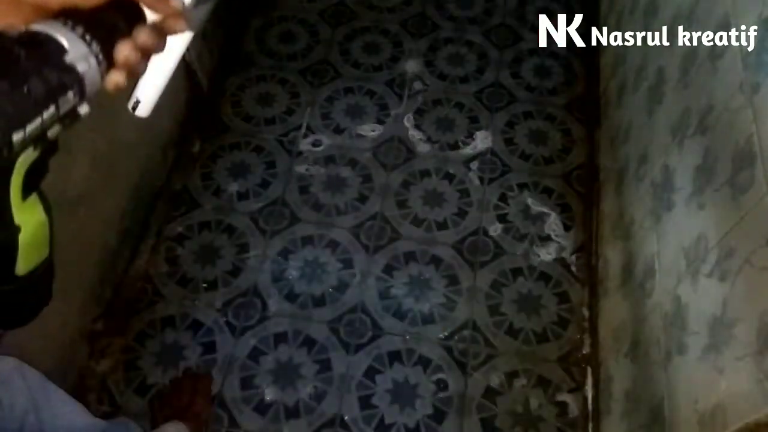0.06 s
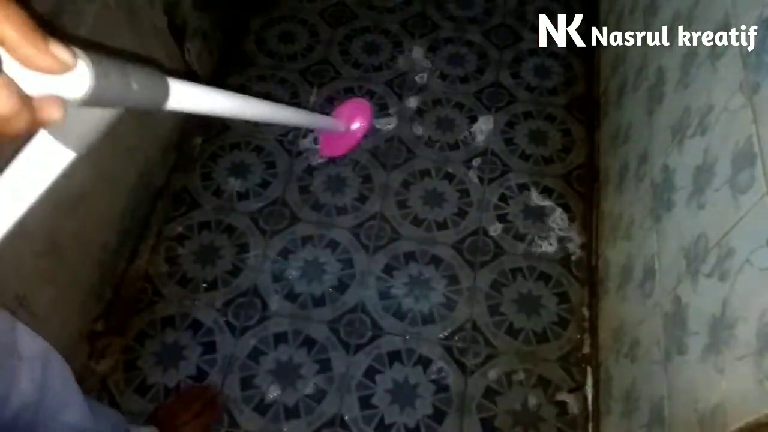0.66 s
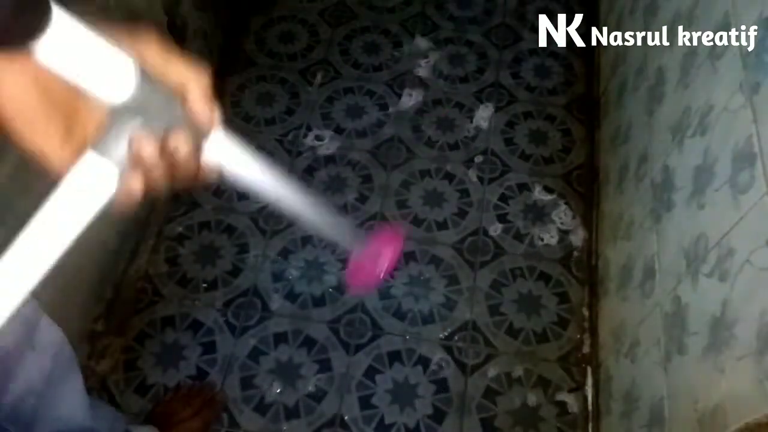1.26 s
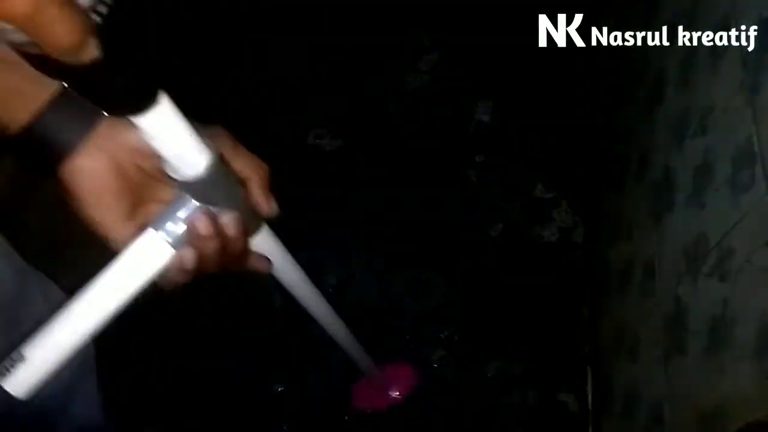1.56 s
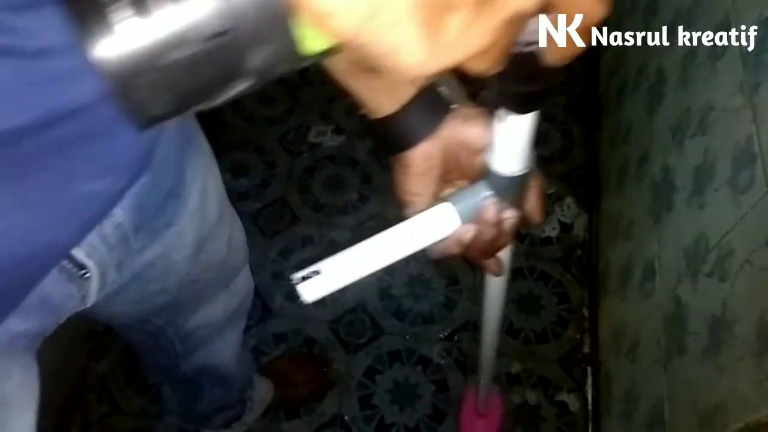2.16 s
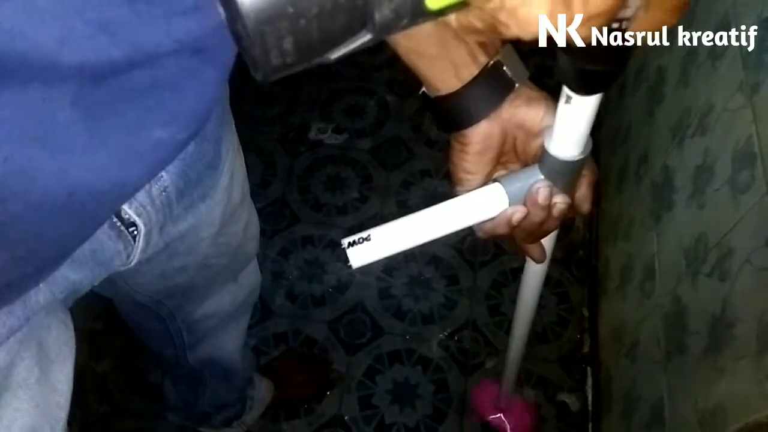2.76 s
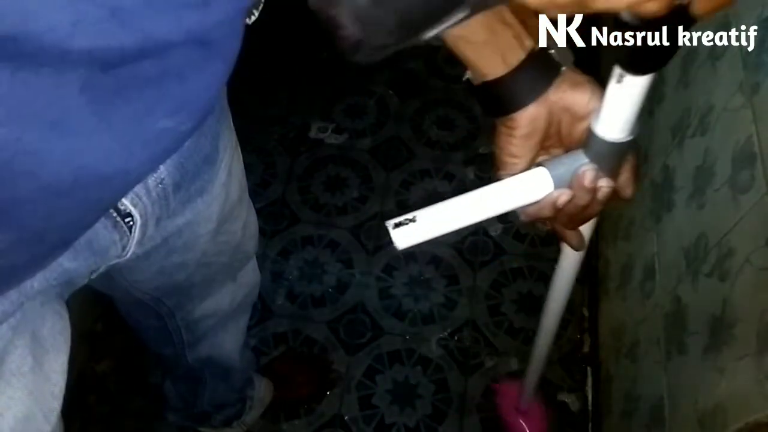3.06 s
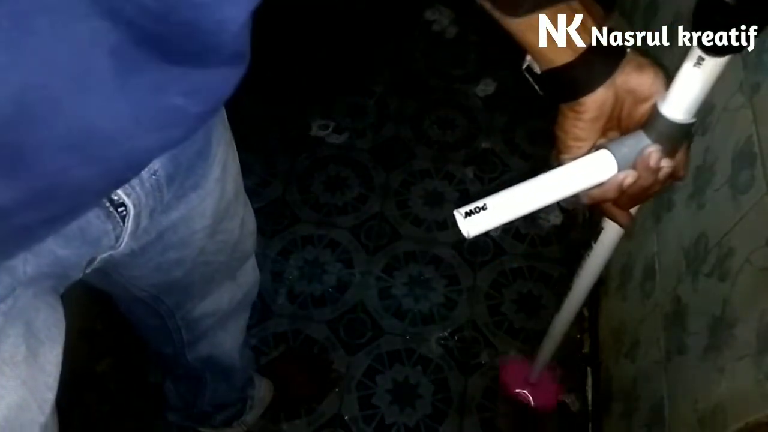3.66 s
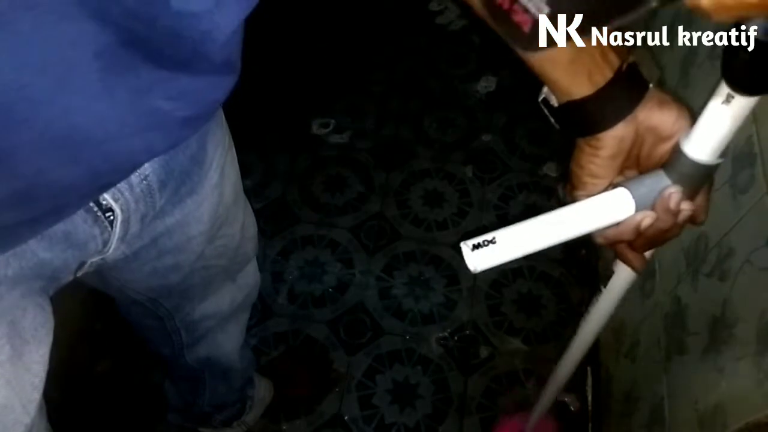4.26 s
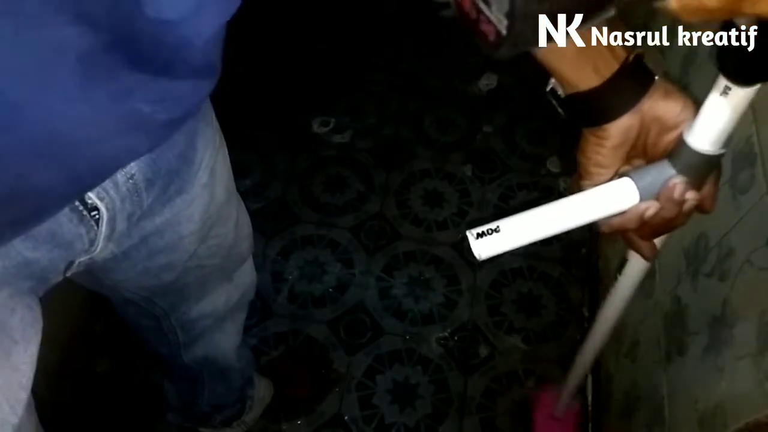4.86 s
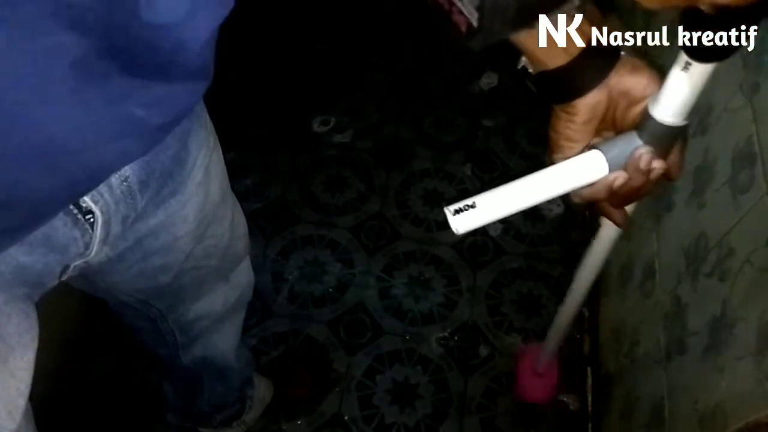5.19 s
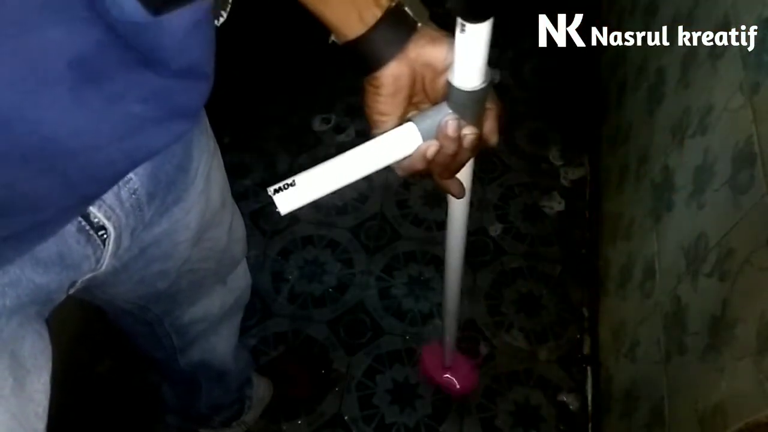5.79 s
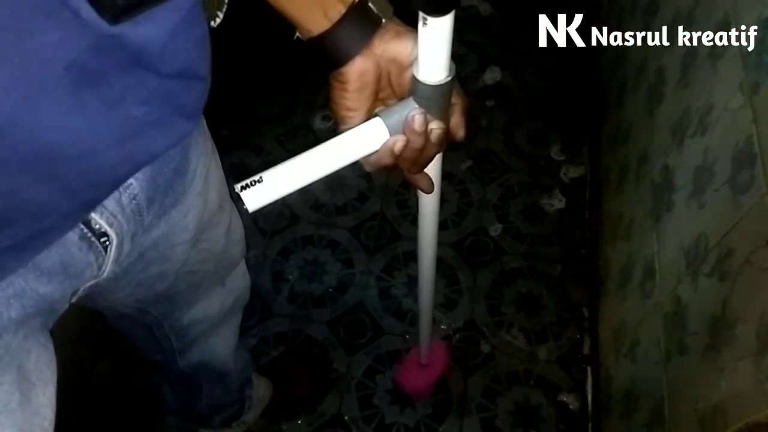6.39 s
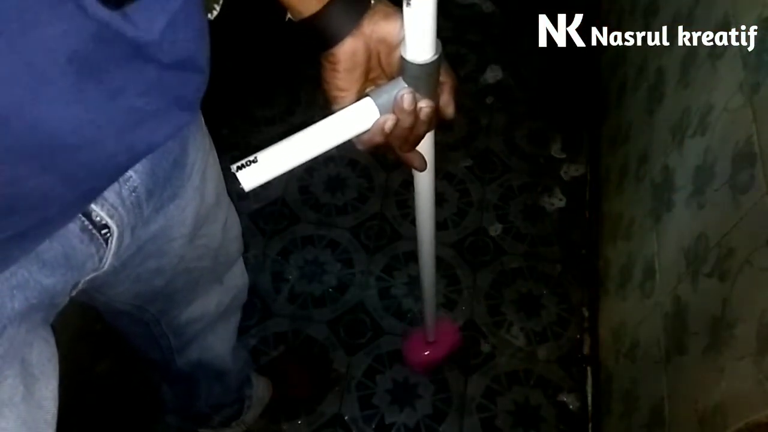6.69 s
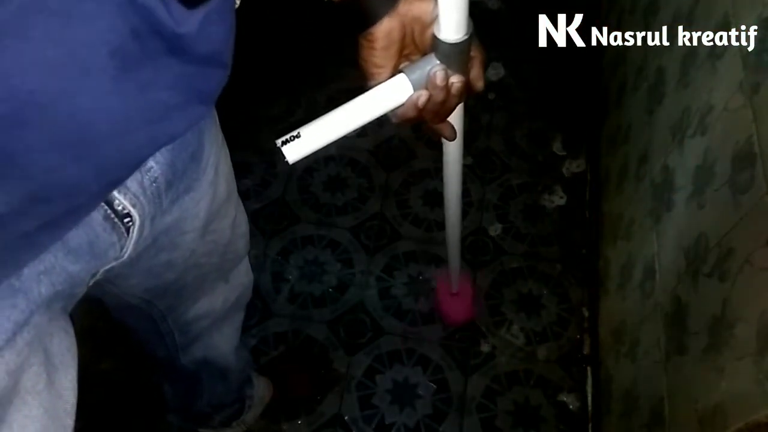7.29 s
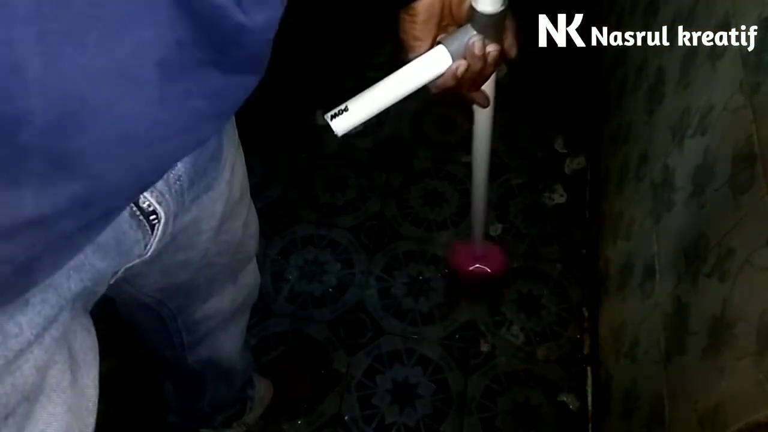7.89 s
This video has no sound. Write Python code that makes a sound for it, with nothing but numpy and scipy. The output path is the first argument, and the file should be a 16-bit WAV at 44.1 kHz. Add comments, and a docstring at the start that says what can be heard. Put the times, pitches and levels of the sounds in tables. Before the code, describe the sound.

In a small tiled bathroom, a cordless drill is handled with soft bumps and clicks while an insect trills faintly. The drill gives a brief whistle, climbs in uneven steps to full speed, and keeps whining and rattling as its plastic brush scrubs the wet floor. The shaft knocks twice in its pipe handle, and the pitch sags slightly under load. The sound is close, with short wall echoes.

```python
"""A cordless drill spins a plastic scrub brush on a long shaft over the wet tiles of a small bathroom.
The trigger is squeezed in uneven steps: the speed control whistles, then motor and gears whine and
rattle, sagging under load. The shaft knocks twice in its pipe handle; echoes off the close walls shift
as the tool moves. Before the start the handled tool bumps and clicks, and an insect trills faintly.
A low drone and faint hiss lie underneath."""
import sys
import numpy as np
from scipy import signal
from scipy.fft import rfft, irfft, next_fast_len
from scipy.io import wavfile
from scipy.ndimage import map_coordinates

SR = 44100
rng = np.random.default_rng(int(sys.argv[2]) if len(sys.argv) > 2 else 0)


def to_wav(s):
    """Save 16-bit WAV."""
    ch = np.atleast_2d(s).T  # columns
    pcm = np.round(np.clip(ch, -1, 1) * 32767)  # PCM
    wavfile.write(sys.argv[1], SR, pcm.astype(np.int16))


N = 354563
TIME_S = np.arange(N) / SR
TOP_HZ = 15600
FULL_SPEED, GEAR_RATIO = 504.5, 56.1  # motor rev/s; motor turns per brush turn
PAN = np.array([[.5], [-.5]])  # splits a left-minus-right level over the channels

# Table levels are relative; spectra are densities.
# tiled room decay: f/Hz, t60/s
ROOM_T60 = [(150, 0.53), (1000, 0.26), (4000, 0.41), (15000, 0.21)]
# left-right likeness: f/Hz, correlation
COHERENCE = [(60, 0.91), (150, 0.91), (380, 0.85), (950, 0.59), (2380, 0.16), (5980, -0.0), (15000, 0.0)]
# distant drone: f/Hz, level/dB
DRONE_SPECTRUM = [(12, -40), (22, -7), (31, -5.5), (40, 0), (58, -0.5), (74, -6), (98, -16), (116, -7.5),
                  (135, -11.5), (156, -26.5), (240, -23.5), (300, -31), (500, -60)]
# background hiss: f/Hz, level/dB
HISS_SPECTRUM = [(150, -14), (300, -7.5), (500, -7), (1000, -11.5), (2200, -17.5), (4000, -16), (5500, -20),
                 (6700, -14), (8000, -24), (10500, -13.5), (12000, -14.5), (13000, -7.5), (14500, -8.5),
                 (15500, -30)]
# insect trills: t/s, length/s, level/dB
INSECT_TRILLS = [(0.095, 0.37, -66.5), (0.828, 0.36, -66.5)]

# tool picked up: t/s, level/dB
PICKUP_BUMPS = [(0.001, -43), (0.073, -49), (0.083, -49), (0.094, -52)]
# dull bump: f/Hz, level/dB
BUMP_SPECTRUM = [(120, -14), (250, 1), (500, 1), (1100, -4), (1500, -2), (1900, -11), (3500, -13.5),
                 (12000, -33)]
# tool and trigger clicks: t/s, snap level/dB, snap cutoff/Hz, shell level/dB, t60/s
TOOL_CLICKS = [(0.7836, -34, 5000, -52, 0.007), (0.8384, -31, 11000, -50, 0.0082),
               (0.946, -45, 14000, -50, 0.13), (0.9485, -37, 10000, -58, .009),
               (1.0028, -36, 12000, -46, .014), (1.004, -42.5, 14000, -46, 0.087),
               (1.319, -80, 5000, -46.5, 0.045), (1.485, -44.5, 14000, -75, 0.063)]
# snap of a click: f/Hz, level/dB
SNAP_SPECTRUM = [(800, -15), (3000, -15), (6000, -8), (8500, -9), (13000, 0), (15500, -1)]
# plastic drill shell: f/Hz, width/Hz, level/dB
SHELL_MODES = [(3120, 360, 4), (4500, 780, -6)]
# rustle as the tool swings out: t/s, level/dB
RUSTLE_LEVEL = [(.4, -100), (.5, -74), (.6, -60.5), (.68, -68), (.8, -64), (.95, -100)]
# same rustle: f/Hz, level/dB
RUSTLE_SPECTRUM = [(100, -13), (500, -5), (2500, -6.5), (12000, -16)]
# shaft hitting its handle, two clusters: t/s, level/dB, cutoff/Hz
SHAFT_CONTACTS = [(4.799, -29, 3000), (4.803, -26.5, 1804), (4.812, -29.5, 1500), (4.819, -26, 1700),
                  (5.143, -26, 1700), (5.152, -30.5, 1500), (5.163, -33, 1300)]
# pipe handle: f/Hz, width/Hz, level/dB
PIPE_MODES = [(290, 210, -11.5), (497, 130, 0.5), (750, 115, 4.5), (1109, 290, 1.5), (1400, 230, 4.5),
              (2150, 1500, -2.5)]

# gear squeals in the run-up: t/s, length/s, start f/Hz, end f/Hz, level/dB
GEAR_SQUEALS = [(1.58, 0.05, 924, 1000, -55.5), (1.63, .08, 6520, 7310, -47.5),
                (1.94, 0.092, 6850, 8400, -48), (1.959, 0.073, 2080, 2300, -58),
                (2.129, 0.21, 7130, 7230, -53.5)]
# speed control whistle: t/s, f/Hz, level/dB
WHISTLE_TRACK = [(1.484, 5970, -110), (1.49, 6080, -61), (1.51, 6040, -57), (1.525, 6010, -60),
                 (1.56, 5750, -61), (1.62, 5630, -65), (1.7, 5700, -120)]
# trigger steps: t/s, target speed/(rev/s), time constant/s
TRIGGER_STEPS = [(1.52, 205, .052), (1.935, 244, 0.02), (2.03, 297, 0.024), (2.25, 335, 0.025),
                 (2.328, FULL_SPEED, 0.031)]
# brush drag on the floor: t/s, motor speed lost/(rev/s)
BRUSH_DRAG = [(2.9, 1.0), (3.25, 2.5), (3.7, -0.03), (4.05, 5), (4.65, 3.5), (4.8, 5.5), (5.3, 4.5),
              (5.6, 9.0), (6.15, 9.5), (6.45, 12), (7.0, 8.5)]
# bristles on tile: f/Hz, level/dB
BRISTLE_SPECTRUM = [(150, -31), (250, -20), (400, -21), (490, -9.5), (575, -16), (680, -10), (800, -12),
                    (1000, -7), (1210, -8), (1330, -8), (1700, -5), (2150, -2.5), (2380, -1), (2570, -1.5),
                    (3500, -4.5), (5000, -8.5), (7000, -61)]
# long shaft: f/Hz, width/Hz
SHAFT_MODES = [(1220, 130), (2150, 147), (2580, 103)]
# shaft ring as the grip changes: t/s, level/dB of modes 1, 2, 3
SHAFT_LEVELS = [(2.45, -20, -6, -15), (2.8, -20, -7.5, -6), (3.3, -35, -8, -13.5), (4.3, -34, -6.5, -9.5),
                (5.0, -20, -9, -14), (5.3, -26, -6, -10), (5.85, -15, -6.5, -9), (6.25, -12, -9.5, -12),
                (7.1, -17, -11, -16), (7.7, -21, -9, -7), (8.0, -22, -13, -12)]
# gear and commutator chatter: f/Hz, level/dB
RATTLE_SPECTRUM = [(1500, -20.5), (3000, -4.5), (3550, -2), (4200, -3), (4850, -2.5), (5650, 3), (6450, 0),
                   (7200, -0.5), (8000, 2), (9150, -2), (10900, 2.5), (11600, 2.5), (12500, 3.5),
                   (14000, 4), (15500, 1)]
# gear casing: f/Hz, width/Hz, level/dB
CASING_MODES = [(3450, 940, 2.5), (4300, 500, 2.5), (5780, 460, 6)]
# loose gears at low speed: motor order, level/dB
GROWL_ORDERS = [(4, -63), (5, -63.5), (6, -62), (7, -67), (8, -64), (9, -62), (9.33, -62.5), (10, -74),
                (12, -69.5), (27, -64), (33, -61), (60, -57), (69, -60)]
# gear teeth, commutator and fan: motor order, level/dB
WHINE_ORDERS = [(2.09, -70), (4, -59.5), (4.33, -56), (6, -55), (8.33, -56), (9, -49), (9.33, -61),
                (10.33, -60), (11.41, -59), (12, -58), (15, -53.5), (21, -56.5), (22, -73), (24, -59),
                (25, -64), (28, -64), (29, -57), (30, -53)]
# whine as the tool moves among the walls: t/s, mid level/dB, treble level/dB
WHINE_SHIFTS = [(2.7, 0.5, 0.5), (3.2, -1, 1), (3.8, -0.5, -2), (4.65, 0, -2.5), (5.25, -1, 0), (5.6, 1, 0),
                (8, -3, -1)]
# radiation of the housing: f/Hz, gain/dB
HOUSING_RESPONSE = [(400, -15), (1000, 10.5), (2200, -0.5), (3500, -28), (4500, -7.5), (6200, 1), (7200, 6),
                    (8500, -3.5), (10500, 6.5), (15000, 7.5)]
# hum at full speed as the tool moves: t/s, level/dB of orders 1, 2, 3
HUM_LEVELS = [(2.6, -50.5, -57.5, -48.5), (3.0, -50.5, -56.5, -47.5), (3.5, -53, -54.5, -53.5),
              (3.8, -50, -53, -53.5), (4.35, -54, -53.5, -58.5), (4.7, -50.5, -54, -53),
              (5.2, -50.5, -55.5, -55), (5.55, -60.5, -57.5, -51), (6.1, -58.5, -54, -50.5),
              (6.6, -59.5, -52, -56.5), (7.2, -59.5, -54.5, -54), (8.0, -58.5, -55.5, -59.5)]
# hum growth with speed: slope/(dB/octave) of orders 1, 2, 3
HUM_SLOPES = [23.5, 8.5, 7]
# hum unsteadiness: depth/dB of orders 1, 2, 3
HUM_FLUTTER = [1.5, 0.9, 0.1]
# standing waves, mostly favouring the right: t/s, left minus right/dB of orders 1, 2, 3
HUM_BALANCE = [(2.0, -4, -7, -1.5), (5.1, -2.5, 4, -8), (5.6, -9, -4, -7), (7.5, -14, -7, -8.5)]
# standing waves swallowing the hum at some pitches: f/Hz, gain/dB
WALL_RESPONSE = [(250, 5), (330, 0.5), (400, -1.5), (480, -1.5), (510, 0), (570, -5), (630, 1.5), (710, 2),
                 (770, -12), (830, -7), (890, -2), (980, 0)]
# tool's stereo balance: f/Hz, left minus right/dB
TOOL_BALANCE = [(60, -9), (130, 0), (290, -0.5), (640, 0), (1410, -2.5), (3100, 2), (6820, -1),
                (15000, 2.5)]
# tool's bearing: t/s, left lag/samples
TOOL_LAG = [(1.7, 11.5), (2.2, 3), (3.2, 2), (4.8, 2.5), (5.3, -0.5), (5.7, 3), (8, 3.5)]

FIRST_STEP_S, FIRST_SPEED_RPS, _ = TRIGGER_STEPS[0]
POWER_ON_S, BREAKAWAY_S, BRUSH_SLIP_S = 1.483, 0.13, 0.035  # current on; gear and bristle onset lengths
SCRUB_DB, SCRUB_CRAWL_DB = -39, -15  # full speed; crawl relative to it
RATTLE_DB, RATTLE_CRAWL_DB = -34, -9
STALL_DB, DRAG_DB_PER_RPS = -14.5, 0.1624  # rattle change when stalled and under load
RASP_DB, LOOSE_DB, FALTER_DB = -15.5, -21, 9


def amp(db):
    """dB to gain."""
    return np.exp(np.log(10) / 20 * np.asarray(db))


def unit(x):
    """Scale to rms 1."""
    return x / np.sqrt(np.mean(x ** 2) + 1e-20)


def along(points, hz):
    """Interpolate (f/Hz, value) rows on a log axis."""
    f, values = np.transpose(points)
    return np.interp(np.log(hz + 1), np.log(f + 1), values)


def curves(rows):
    """One per-sample curve for each column after t/s."""
    times_s, *columns = np.transpose(rows)
    return [np.interp(TIME_S, times_s, column) for column in columns]


def ramp(start_s, length_s):
    """Linear rise from 0 to 1."""
    return np.clip((TIME_S - start_s) / length_s, 0, 1)


def wobble(rate_hz):
    """Smooth random curve, rate_hz knots a second."""
    coarse_s = TIME_S[::16]
    knots = rng.standard_normal(int(N * rate_hz / SR) + 4)
    return np.interp(TIME_S, coarse_s, map_coordinates(knots, [coarse_s * rate_hz]))


def white():
    """Two independent white noises."""
    return rng.standard_normal((2, N))


def burst(start_s, t60_s):
    """Decaying noise burst."""
    return (TIME_S >= start_s) * amp(-60 * np.abs(TIME_S - start_s) / t60_s) * rng.standard_normal(N)


def impacts(rate_hz):
    """Two independent streams of tiny impacts, rms 1."""
    return unit((rng.random((2, N)) < rate_hz / SR) * rng.uniform(-1.02, 1, (2, N)))


def filtered(x, response):
    """Apply the gain response(f/Hz)."""
    size = next_fast_len(N + SR // 2)
    return irfft(rfft(x, size) * response(np.fft.rfftfreq(size, 1 / SR)), size)[..., :N]


def shaped(x, spectrum):
    """Apply (f/Hz, gain/dB) rows."""
    return filtered(x, lambda hz: amp(along(spectrum, hz)))


def softened(x, cutoff_hz):
    """Soft contact: one-pole low-pass."""
    pole = np.exp(-2 * np.pi * cutoff_hz / SR)
    return signal.lfilter([1 - pole], [1, -pole], x)


def ringing(x, modes):
    """Body resonances (f/Hz, width/Hz, level/dB), alternating in sign."""
    return filtered(x, lambda hz: sum(
        (-1) ** k * amp(db) * 1j * hz * width_hz / (mode_hz ** 2 - hz ** 2 + 1j * hz * width_hz)
        for k, (mode_hz, width_hz, db) in enumerate(modes)))


def spread(pair, spectrum):
    """Colour two independent signals into a stereo field of rms 1, coherent in the bass."""
    def mid_side_gains(hz):
        angle = np.arccos(np.clip(along(COHERENCE, hz), -1, 1)) / 2
        return amp(along(spectrum, hz)) * [np.cos(angle), np.sin(angle)]
    mid, side = filtered(pair, mid_side_gains)
    return unit(np.array([mid + side, mid - side]))


def left_late(pair, lag_samples):
    """Off-centre source: the left channel lags below about 2.5 kHz."""
    low = filtered(pair[0], lambda hz: 1 / (1 + (hz / 2500) ** 4))
    delayed = np.interp(np.arange(N) - lag_samples, np.arange(N), low)
    return np.array([pair[0] - low + delayed, pair[1]])


def room(x, wet_db):
    """Direct sound plus the reverberation of the tiled walls."""
    hz, t_s, noise = signal.stft(rng.standard_normal((2, SR // 2)), SR, nperseg=256)
    decay = amp(-60 * t_s / along(ROOM_T60, hz)[:, None])
    tail = signal.istft(noise * decay, SR, nperseg=256)[1]
    delayed = np.pad(x, (130, 0))[None]
    wet = signal.fftconvolve(delayed, tail / np.linalg.norm(tail[0]), axes=1)[:, :N]
    return (x + amp(wet_db) * wet) / np.hypot(1, amp(wet_db))


def near_walls(x, echo_db, drift_s, count):
    """Close echoes comb the sound; their paths drift as the tool moves."""
    out = x.copy()
    for channel in range(2):
        for _ in range(count):
            delay_s = rng.uniform(.002, .016) + drift_s * wobble(1.2)
            index = np.clip(np.round((TIME_S - delay_s) * SR).astype(int), 0, N - 1)
            out[channel] += amp(echo_db) * x[channel, index]
    return out / np.sqrt(1 + count * amp(echo_db) ** 2)


def background():
    """Distant, near-steady drone under faint hiss."""
    drone = amp(-56 + 0.19 * wobble(1.9)) * spread(white(), DRONE_SPECTRUM)
    return left_late(drone, lag_samples=10) + amp(-64.5) * spread(white(), HISS_SPECTRUM)


def insect():
    """Thin, rasping trills near 6.8 kHz that swell and fade."""
    swell = sum(amp(db) * np.sqrt(np.abs(np.sin(np.pi * ramp(start_s, length_s))))
                for start_s, length_s, db in INSECT_TRILLS)
    band = spread(white(), [(5800, -60), (6450, -10), (6770, -8), (7000, -10), (7500, -58)])
    return swell * band * amp(1.7 * wobble(116.5))


def handling():
    """The handled tool bumps, clicks with a ring of its shell, and rustles as it swings out."""
    bumps = shaped(sum(amp(db) * burst(t_s, t60_s=0.072) for t_s, db in PICKUP_BUMPS), BUMP_SPECTRUM)
    snaps = sum(amp(db) * softened(burst(t_s, t60_s), cutoff_hz)
                for t_s, db, cutoff_hz, _, t60_s in TOOL_CLICKS)
    taps = sum(amp(db) * burst(t_s, t60_s) for t_s, _, _, db, t60_s in TOOL_CLICKS)
    clicks = shaped(snaps, SNAP_SPECTRUM) + ringing(taps, SHELL_MODES)
    contacts = room(clicks, wet_db=1) + room(amp(10.5) * bumps, wet_db=2.5)
    rustle_db, = curves(RUSTLE_LEVEL)
    return contacts + amp(rustle_db) * spread(white(), RUSTLE_SPECTRUM)


def knocks():
    """Each shaft blow, an impulse plus short chatter, rings the plastic pipe handle."""
    blows = np.zeros(N)
    for t_s, db, cutoff_hz in SHAFT_CONTACTS:
        blow = amp(-1.5) * burst(t_s, t60_s=0.028)
        blow[round(t_s * SR)] += amp(18)
        blows += amp(db) * filtered(blow, lambda hz: 1 / (1 + 1j * hz / cutoff_hz))
    return amp(13) * room(ringing(blows, PIPE_MODES), wet_db=-1.5)


def squeals():
    """Rough chirps where a gear tone sweeps through a resonance."""
    out = np.zeros(N)
    for start_s, length_s, start_hz, end_hz, db in GEAR_SQUEALS:
        progress = ramp(start_s, length_s)
        pitch_hz = (start_hz + progress * (end_hz - start_hz)) * (1 + 0.024 * wobble(700))
        envelope = amp(db + 4 + 5.1 * wobble(200)) * np.sin(np.pi * progress)
        out += envelope * np.sin(2 * np.pi * np.cumsum(pitch_hz) / SR)
    return room(out, wet_db=0)


def speed_control():
    """Chopped current whistles in the windings until the rotor gets going."""
    pitch_hz, db = curves(WHISTLE_TRACK)
    phase = 2 * np.pi * np.cumsum(pitch_hz) / SR
    return room(amp(db) * (np.sin(phase) + 1.3 * np.sin(2 * phase)), wet_db=8)


def scrub(brush_rad):
    """Bristles flick over wet tiles and ring the shaft, pressing harder once a brush turn."""
    pressure = amp(0.058 * np.sin(brush_rad) + 0.39 * wobble(45))
    bristles = near_walls(impacts(350) + 1.3 * white(), echo_db=-12, drift_s=.00015, count=6)
    shaft = np.zeros((2, N))
    for (hz, width_hz), db in zip(SHAFT_MODES, curves(SHAFT_LEVELS)):
        gain = amp(db + 0.97 * wobble(9))
        mode = ringing(white(), [(hz, width_hz, 0)])
        shaft += gain * unit(ringing(mode, [(hz, 2 * width_hz, 0)]))  # second pass: steeper skirts
    return (amp(-0.6) * spread(bristles, BRISTLE_SPECTRUM) + shaft) * pressure


def rattle(turns, brush_rad):
    """Gears and commutator chatter, swaying with the shaft; catching teeth rasp in the casing."""
    bunching = amp(0.4 * np.sin(2 * np.pi * turns) + 0.99 * wobble(700))
    sway = amp(0.5 * np.sin(brush_rad) + 0.5 * np.sin(2 * brush_rad) + 0.76 * wobble(7.7))
    chatter = (impacts(750) + 2.24 * white()) * bunching
    chatter = near_walls(chatter, echo_db=-10, drift_s=.00007, count=5)
    rasp = unit(ringing(impacts(300), CASING_MODES))
    return (spread(chatter, RATTLE_SPECTRUM) + amp(RASP_DB) * rasp) * sway


def growl(turns, slack):
    """Unloaded teeth clatter in rough partials, gone at full speed."""
    shaky_turns = turns + 0.011 * wobble(140)
    partials = sum(amp(db + 3 * wobble(40.04)) * np.sin(2 * np.pi * (order * shaky_turns + rng.random()))
                   for order, db in GROWL_ORDERS)
    return np.sqrt(np.minimum(slack / 0.3, 1)) * partials


def whine(turns, speed_rps):
    """Gear tones smeared by backlash and the room; slow gears run looser and growl."""
    slack = np.clip(1 - speed_rps / 490, 0, 1)
    backlash_turns = (0.0016 + 0.03 * slack) * wobble(260) + 0.0061 * wobble(45)
    mid_db, treble_db = curves(WHINE_SHIFTS)
    teeth = np.zeros(N)
    for order, db in WHINE_ORDERS:
        shift_db = mid_db if order < 13 else treble_db
        fading_db = wobble(6)  # tool moving among the walls
        phase = 2 * np.pi * (order * (turns + backlash_turns) + rng.random())
        teeth += amp(db + shift_db + fading_db) * np.sin(phase)
    teeth = shaped(teeth * amp(LOOSE_DB * np.sqrt(slack)), HOUSING_RESPONSE)
    spin_up = np.minimum(speed_rps / FIRST_SPEED_RPS, 1) ** 2
    return np.sqrt(2) * amp(-0.5) * room(teeth + spin_up * growl(turns, slack), wet_db=3)


def hum(turns, speed_rps):
    """Rotor orders 1-3: firm at full speed, shaky and faltering on the way up."""
    slack = np.clip(1 - speed_rps / 500, 0, 1)
    shaky_turns = turns + 0.068 * slack * wobble(160)
    octaves = np.log2(speed_rps / FULL_SPEED)
    spin_up_db = 60 * np.log10(np.minimum(speed_rps / FIRST_SPEED_RPS, 1))
    tones = zip(curves(HUM_LEVELS), HUM_SLOPES, curves(HUM_BALANCE), HUM_FLUTTER)
    out = np.zeros((2, N))
    for order, (db, slope, balance_db, flutter_db) in enumerate(tones, 1):
        level_db = db + slope * octaves + spin_up_db
        unsteady_db = flutter_db * wobble(22) - FALTER_DB * slack * np.abs(wobble(24.96))
        walls_db = along(WALL_RESPONSE, order * speed_rps) + balance_db * PAN
        out += amp(level_db + unsteady_db + walls_db) * np.sin(2 * np.pi * order * shaky_turns)
    return np.sqrt(2) * amp(0.5) * out


def motor_speed(drag_rps):
    """Speed in rev/s: eases to each trigger target, sags with brush drag."""
    speed_rps, previous_rps = np.zeros(N), 0
    for start_s, target_rps, tau_s in TRIGGER_STEPS:
        age = np.maximum(TIME_S - start_s, 0) / tau_s
        speed_rps += (target_rps - previous_rps) * (1 - (1 + age) * np.exp(-age))
        previous_rps = target_rps
    return np.maximum(speed_rps - drag_rps, 1)


def growth(speed_rps, crawl_db):
    """Noise gain: power law from crawl_db at rest to unity at full speed."""
    return amp(crawl_db) + (1 - amp(crawl_db)) * (speed_rps / FULL_SPEED) ** 2.9


def drill():
    """The motor drives the brush through a reduction gear; each brush turn rocks its speed."""
    drag_rps, = curves(BRUSH_DRAG)
    speed_rps = motor_speed(drag_rps)
    brush_rad = 2 * np.pi * np.cumsum(speed_rps / GEAR_RATIO) / SR
    rocking = 1 + 0.0019 * np.sin(brush_rad) + 0.001814 * wobble(22)
    turns = np.cumsum(speed_rps * rocking) / SR
    brush_gain = ramp(FIRST_STEP_S, BRUSH_SLIP_S) * amp(SCRUB_DB) * growth(speed_rps, SCRUB_CRAWL_DB)
    running = ramp(POWER_ON_S, BREAKAWAY_S) ** 2
    rattle_db = RATTLE_DB + STALL_DB * (1 - running) + DRAG_DB_PER_RPS * drag_rps
    rattle_gain = ramp(POWER_ON_S, .004) * amp(rattle_db) * growth(speed_rps, RATTLE_CRAWL_DB)
    noise = brush_gain * scrub(brush_rad) + rattle_gain * rattle(turns, brush_rad)
    return noise + running * (hum(turns, speed_rps) + whine(turns, speed_rps))


def scene():
    """Bathroom mix; the tool moves in the stereo field."""
    tool = filtered(drill() + knocks(), lambda hz: amp(along(TOOL_BALANCE, hz) * PAN))
    lag_samples, = curves(TOOL_LAG)
    tool = left_late(tool, lag_samples)
    return tool + speed_control() + squeals() + handling() + insect() + background()


def record(dry):
    """Brick-wall low-pass at TOP_HZ."""
    return filtered(dry, lambda hz: hz < TOP_HZ)


dry = scene()
out = record(dry)
to_wav(out)
```